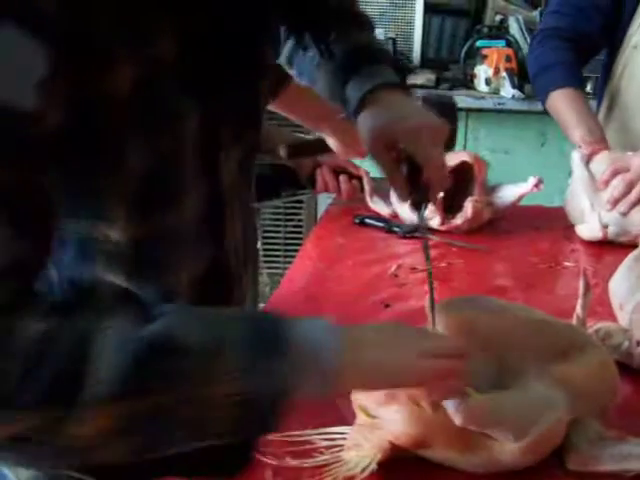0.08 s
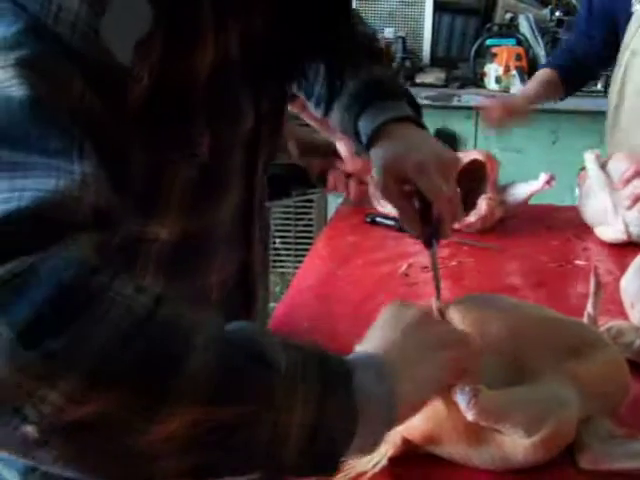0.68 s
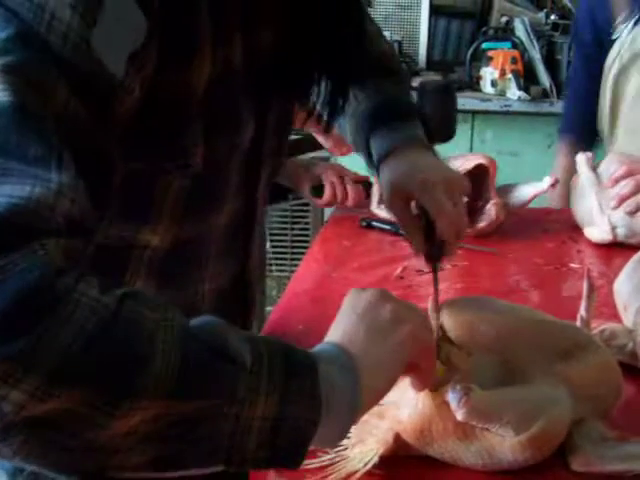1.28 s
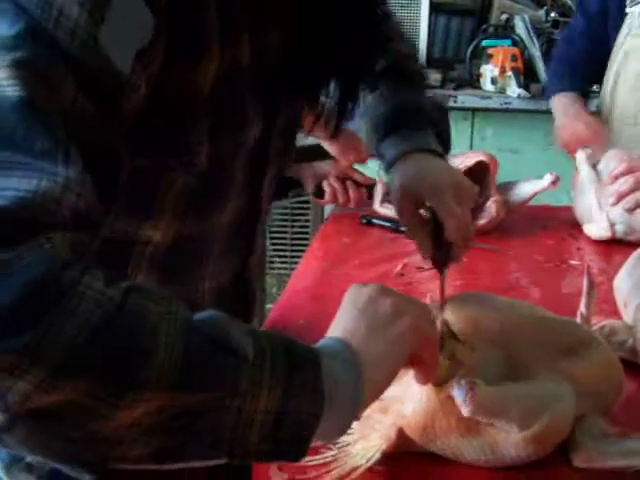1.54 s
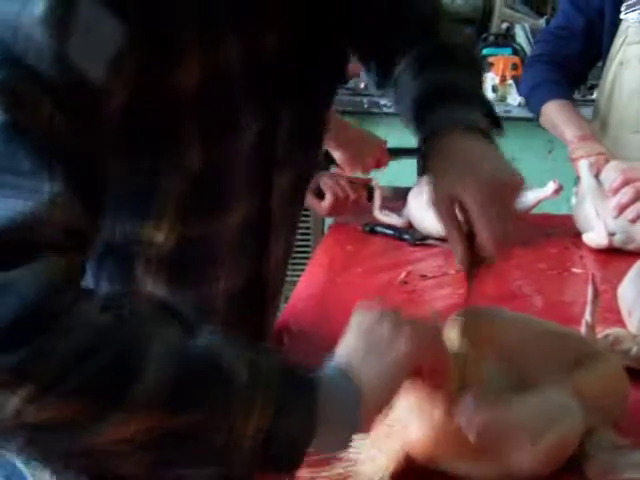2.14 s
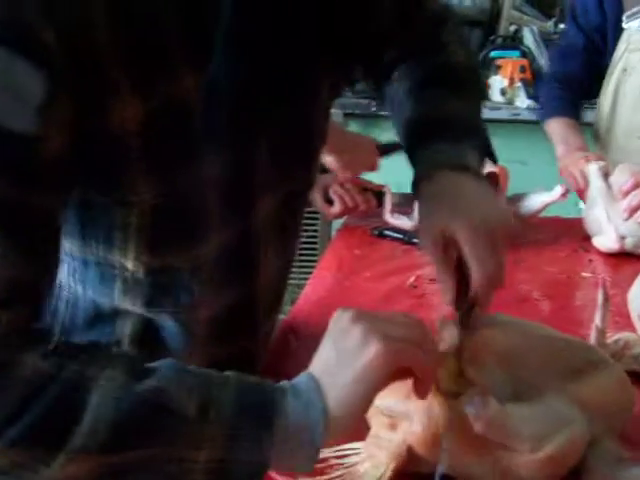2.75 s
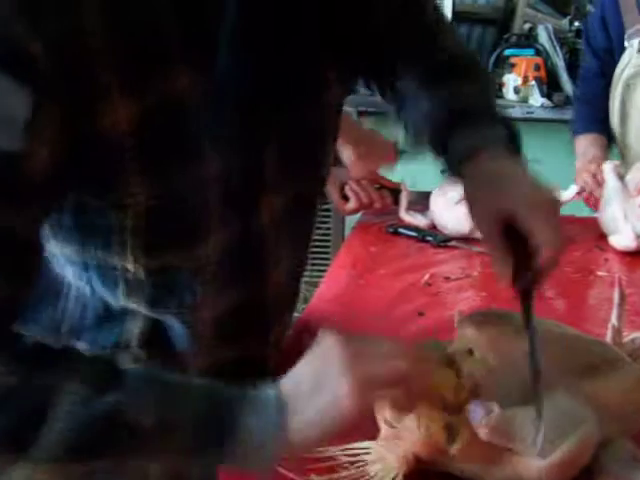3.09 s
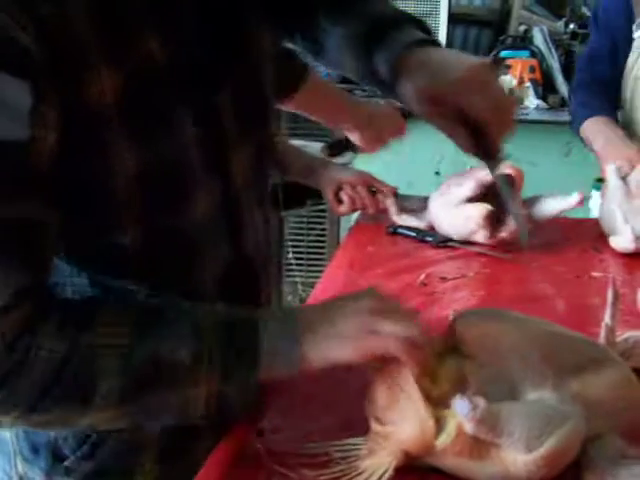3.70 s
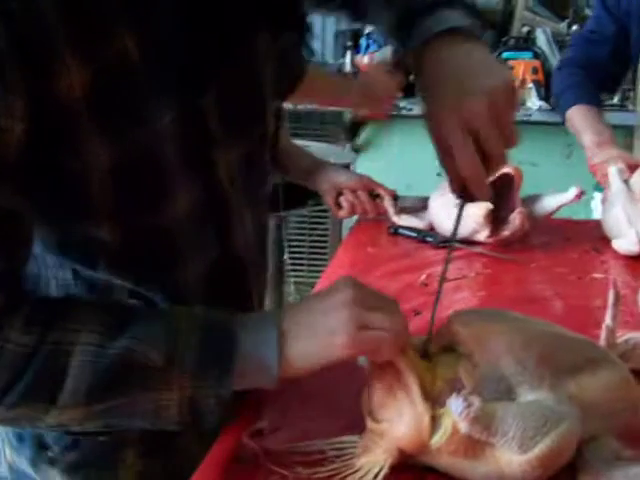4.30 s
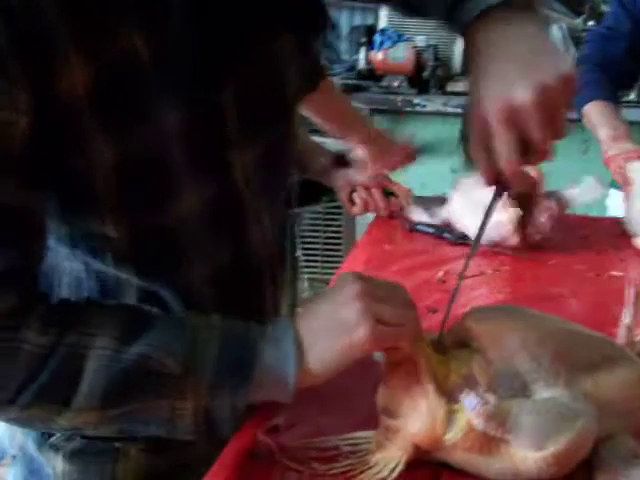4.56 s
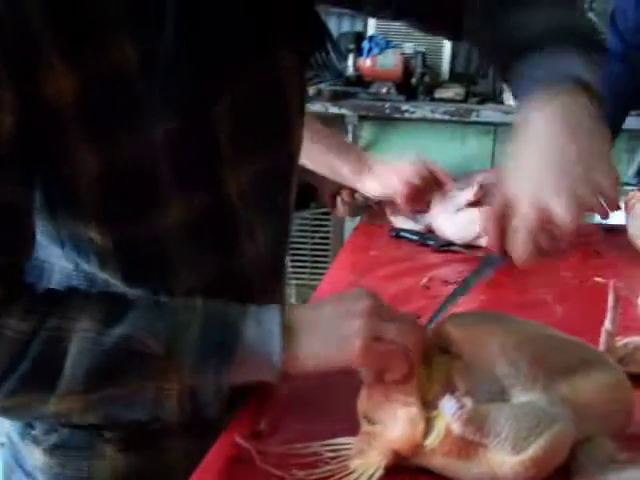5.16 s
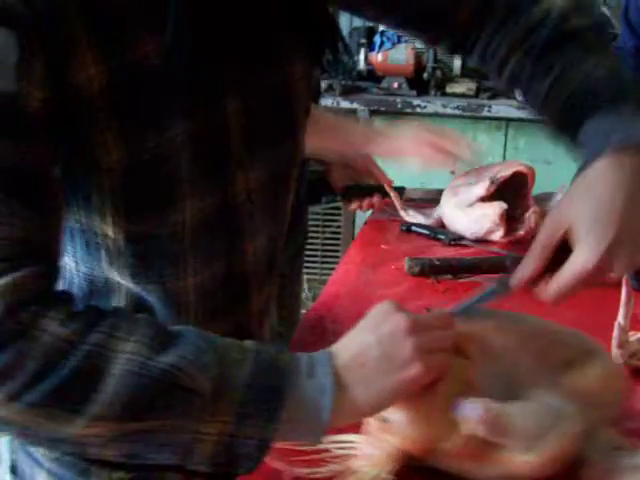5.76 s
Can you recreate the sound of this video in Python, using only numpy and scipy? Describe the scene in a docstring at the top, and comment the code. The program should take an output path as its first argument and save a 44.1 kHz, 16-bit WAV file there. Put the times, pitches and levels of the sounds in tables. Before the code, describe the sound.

A chicken is chopped up on a board, heard from a small microphone close to the table in a bare farm workroom. A loud, slightly distorted knife blow splinters bone and echoes. A quieter stretch follows, with wet ticks, fine slicing, little snips and soft low shoves, before four more blows knock and thump down. A low hum runs underneath.

```python
"""A bare, echoing farm workroom, a small microphone close to the table where a chicken is chopped up.
Over a low hum, wet skin ticks and a knife starts to slice. At 0.7 s a heavy blow crunches through bone,
thumps the board and overloads the microphone; the blade knocks, bone splinters and the room rings on.
The bird is shoved about with a soft rumble, amid bumps, faint slicing and snips of gristle.
From 3.5 to 5.7 s four more blows land, with small cuts between them."""
import sys
import numpy as np
from scipy import signal
from scipy.fft import rfft, irfft
from scipy.io import wavfile

SR = 44100
rng = np.random.default_rng(int(sys.argv[2]) if len(sys.argv) > 2 else 0)


def wrap_up_sound(samples):
    """Save the sound to the file named by the first command line argument, as 16-bit audio."""
    columns = np.atleast_2d(samples).T
    # keep every value between -1 and 1, then stretch to whole-number steps
    tamed = np.clip(columns, -1, 1)
    steps = np.round(tamed * 32767).astype(np.int16)
    wavfile.write(sys.argv[1], SR, steps)


N = 261072

# room tone, as a spectrum: (frequency [Hz], relative level [dB])
ROOM_TONE = [(15, -58), (25, -11), (49, -6.5), (63, -7), (77, -4), (97, -4.5), (199, -10), (299, -9),
             (530, -14), (875, -20), (1110, -17.5), (2170, -26.5), (3030, -25.5), (3490, -29), (7500, -34),
             (9750, -32.5), (16500, -120)]
# low hum in the room: (frequency [Hz], level [dB], half-width [Hz])
HUM_BANDS = [(96.94, -45.5, 3), (129.8, -49.5, 2.8)]
# reverberation of the bare room: (frequency [Hz], time to fall 60 dB [s])
ROOM_DECAY = [(100, 0.68), (260, 0.64), (700, 0.71), (1840, 0.76), (4850, 0.61), (8000, 0.43)]
# colour of that reverberation: (frequency [Hz], gain [dB])
ROOM_RESPONSE = [(25, -21.5), (60, -6), (130, 5.5), (300, 3), (600, -4.5), (1200, -5), (2400, -4),
                 (4500, -5.5), (8000, -11)]
# the knife snips a strand of gristle: (time [s], level [dB], centre [Hz])
GRISTLE_SNIPS = [(0.113, -29, 3020), (1.2878, -29.5, 4900), (1.392, -30, 6200), (1.6308, -28.5, 3450),
                 (1.943, -19, 4500), (2.0887, -29.5, 6180), (2.291, -30, 3300), (2.4043, -32, 4500),
                 (2.4589, -25, 4540), (2.6449, -16.5, 4950), (2.7982, -26.5, 4350), (2.828, -28.5, 6000),
                 (3.1430, -27, 7600), (3.1652, -28, 6870), (3.4258, -18.5, 6400), (3.441, -27.5, 6570),
                 (4.057, -33.5, 5150), (4.9670, -29, 5820), (5.282, -29.5, 3400), (5.6005, -23, 5700)]
# strokes of the blade through wet skin: (time [s], length [s], level [dB], centre [Hz])
SKIN_CUTS = [(0.601, 0.22, -47, 4160), (1.352, 0.99, -52, 4970), (2.103, 0.51, -52.5, 4860),
             (2.435, 0.076, -39, 5140), (2.626, 0.078, -38, 4700), (2.795, 0.047, -37.5, 4770),
             (4.028, 0.23, -51.5, 5400), (5.194, 0.23, -50.5, 5400)]
# heavy blows, each followed by its lighter rebound: (time [s], thump level [dB], thump centre [Hz],
#   mode with a node at that spot [Hz], smack level [dB], smack centre [Hz], room level [dB],
#   room centre [Hz], bone crunch level [dB])
BLOWS = [(0.7120, 4, 233, 271, -12.5, 1320, 18.5, 560, -11),
         (0.7790, -10, 400, 293, -18.5, 1010, 7.5, 520, -20),
         (3.5046, 2.5, 188, 387, -11, 1500, 16.5, 420, -6.5),
         (3.6007, -10.5, 440, 310, -12.5, 930, 13, 800, -32),
         (4.5190, 5.5, 206, 376, -4.5, 1120, 19.5, 460, -8.5),
         (4.5690, -8.5, 229, 396, -18, 910, 16, 760, -29), (5.4510, 8, 273, 880, -9.5, 705, 5.5, 260, -33),
         (5.4985, -6.5, 255, 490, -25.5, 2470, 2, 420, -28),
         (5.732, 0, 426, 206, -15.5, 1650, 18, 596, -40), (5.7770, -6, 480, 203, -34, 1500, -2, 1200, -42)]
# the blade knocks on bone and board: (time [s], level [dB], ring [Hz], room level [dB])
BLADE_KNOCKS = [(0.7108, 0, 3560, -10), (0.7300, 0, 2040, 8.5), (0.7788, -9, 1080, -6),
                (3.5045, 1, 2300, 9.5), (3.5223, -4, 2114, 1), (3.5996, -5, 1770, 6), (3.6227, -9, 1045, 1),
                (4.518, 1, 2090, -1.5), (4.536, -1.5, 1620, 9), (4.5685, -5.5, 2470, -9),
                (5.451, -2.5, 2430, -2), (5.731, 15, 2276, 13.5)]
# modes of the board and the table under it: (frequency [Hz], relative level [dB], time to fall 60 dB [s])
BOARD_MODES = [(67, -21.5, 0.63), (128, -3, 0.082), (182.7, -6, 0.057), (212.8, -2, 0.075),
               (247.6, -5, 0.12), (308, 4.5, 0.065), (350.6, 4, 0.065), (459, 3.5, 0.041),
               (537.6, 2, 0.063), (614.3, -4.5, 0.11), (754, -7.5, 0.13), (936, -30, 0.057),
               (1152, -2, 0.036), (1153, -10, 0.041), (1630, -9, 0.092)]
# the room's strongest resonances: (frequency [Hz], level relative to a blow's room level [dB])
STANDING_WAVES = [(303, -45.5), (494, -45.5), (544, -40.5), (612, -43.5), (721, -48), (967, -49.5),
                  (1112, -45.5), (1245, -46), (1470, -56.5), (1755, -48.5)]
# bone splinters around the blade: (time [s], level [dB], centre [Hz], decay [s])
BONE_CRACKS = [(0.7300, -16, 4140, 0.0019), (0.7565, -17, 4400, 0.0053), (0.8305, -18.5, 4180, 0.011),
               (0.8405, -17, 3950, 0.0053), (3.5070, -4.5, 5700, 0.0026), (3.5580, -15, 5360, 0.0031),
               (3.5685, -14, 5440, 0.003), (3.5765, -7.5, 4200, 0.0013), (3.5858, -14.5, 5670, 0.0038),
               (3.6380, -20, 4160, 0.0035), (4.5150, -6, 5260, 0.0016), (4.5270, -15.5, 4280, 0.004),
               (4.5690, -6, 4800, 0.00096), (4.5835, -18, 5260, 0.007), (5.4635, -26, 4960, 0.02),
               (5.8635, -28, 5600, 0.0013)]
# the bird is pushed along the table: (time [s], length [s], relative level [dB])
BIRD_SHOVES = [(1.047, 0.21, -32.5), (1.246, 0.78, -32.5), (1.998, 0.11, -36), (2.474, 0.18, -35.5),
               (2.69, 0.21, -41)]
# spectrum of a shove: (frequency [Hz], relative level [dB])
SHOVE_SPECTRUM = [(20, -17), (40, 7), (75, 3.5), (130, -1), (200, -8.5), (350, -29), (900, -63)]
# soft bumps close to the microphone: (time [s], level [dB], centre [Hz], decay [s])
CLOSE_BUMPS = [(1.312, -29, 110, 0.012), (1.474, -28.5, 173, 0.0094), (1.634, -26.5, 89, 0.029),
               (1.657, -17.5, 158, .011), (1.698, -24, 131, 0.0069)]
#   (frequency [Hz], gain [dB])
RECORDING_BAND = [(20, 1), (6000, -0.5), (7000, -1.5), (7700, -7), (8400, -17), (9100, -36.5), (10000, -91)]


def amp(db):
    """Decibels to gain."""
    return 10 ** (np.asarray(db) / 20)


def unit(x):
    """Scales to rms 1."""
    return x / np.sqrt(np.mean(x ** 2) + 1e-20)


def curve(points, hz):
    """Joins (Hz, value) points by straight lines on a log-frequency axis."""
    f, value = np.transpose(points)
    return np.interp(np.log(hz + 1), np.log(f + 1), value)


def add(mix, s, sound):
    """Lays a sound into the mix at time s."""
    part = mix[round(s * SR):][:len(sound)]
    part += sound[:len(part)]


def noise(gain, size=N, grain_db=0):
    """Noise of rms 1 whose spectrum is the function gain(Hz); grain_db breaks it up into crackle."""
    grains = np.repeat(np.clip(rng.standard_normal(size // 16 + 1), -2, 2), 16)[:size]
    white = rng.standard_normal(size) * amp(grain_db * grains)
    return unit(irfft(rfft(white) * gain(np.fft.rfftfreq(size, 1 / SR)), size))


def hump(hz, centre_hz, octaves):
    """A broad resonance on the log-frequency axis."""
    return 1 / (1 + (np.log2((hz + 1) / centre_hz) / octaves) ** 2)


def burst(centre_hz, decay_s, octaves, rise_s=0.00059, size=4096):
    """A dense cluster of tiny fractures: coloured, grainy noise that dies quickly."""
    t = np.arange(size) / SR
    shape = np.exp(-t / decay_s) * (1 - np.exp(-t / rise_s))
    sound = shape * noise(lambda f: hump(f, centre_hz, octaves) ** 2, size, grain_db=5.5)
    return sound * np.linalg.norm(shape) / np.linalg.norm(sound)


def click(centre_hz, octaves, size=512):
    """One smooth pulse of energy 1: what a blow radiates into the room, summed over all directions."""
    spectrum = hump(np.fft.rfftfreq(size, 1 / SR), centre_hz, octaves) ** 2
    pulse = np.fft.fftshift(irfft(spectrum))
    return pulse / np.linalg.norm(pulse)


def echo(x, build_s=0.065, gap_s=0.00059):
    """The room's tail at the microphone: uneven reflections thicken, each band dies at its own rate."""
    hz, t, bands = signal.stft(noise(np.ones_like, size=SR, grain_db=5), SR, nperseg=512)
    thickening = np.sqrt(1 - np.exp(-np.maximum(t - gap_s, 0) / build_s))
    shape = thickening * amp(-60 * t / curve(ROOM_DECAY, hz)[:, None])
    energy = SR * np.mean(shape ** 2, axis=1, keepdims=True)
    shape *= amp(curve(ROOM_RESPONSE, hz))[:, None] / np.sqrt(energy)
    return signal.fftconvolve(x, signal.istft(bands * shape, SR, nperseg=512)[1])


def in_room(direct, room_db):
    """The close sound with the room's tail behind it."""
    return direct + amp(room_db) * echo(direct)[:N]


def snaps(rows, octaves, rise_s, ring, room_db):
    """Short bursts in the room; each sets the piece it comes from ringing briefly."""
    out, t = np.zeros(N), np.arange(SR // 10) / SR
    for s, db, hz, decay_s in rows:
        tone = np.sin(2 * np.pi * hz * t) * np.exp(-t / decay_s) * (1 - np.exp(-t / rise_s))
        add(out, s, amp(db) * burst(hz, decay_s, octaves, rise_s))
        add(out, s, amp(db) * ring * tone)
    return in_room(out, room_db)


def stroke(length_s, peak_at):
    """The pressure of one push of the hand: an arch that reaches 1 at the share peak_at of its length."""
    progress = np.linspace(0, 1, round(length_s * SR))
    return np.sin(np.pi * np.interp(progress, [0, peak_at, 1], [0, .5, 1]))


def crackle(size, centre_hz, per_s, spread_db, octaves):
    """Wet fibres part one by one: dense tiny clicks of uneven strength and pitch, rms 1."""
    fibres = np.zeros(size)
    for hz in centre_hz * np.geomspace(.72, 1.4, 8):
        parting = rng.random(size) < per_s / 8 / SR
        strength = amp(spread_db * np.minimum(rng.exponential(1, size), 3.5))
        fibres += signal.oaconvolve(parting * strength, burst(hz, 0.0021, octaves, size=512))[:size]
    return unit(fibres)


def room_tone(air_db=-40.5):
    """The workroom's steady noise, with a wavering low hum."""
    hum = sum(amp(db) * noise(lambda f: 1 / (1 + ((f - hz) / width) ** 2)) for hz, db, width in HUM_BANDS)
    return hum + amp(air_db) * noise(lambda f: amp(curve(ROOM_TONE, f)))


def sticky_skin(per_s=16, floor_db=-47, spread_db=3, low_hz=3000, high_hz=7000):
    """Wet skin sticks and lets go under the fingers: faint scattered ticks, each with its own pitch."""
    out = np.zeros(N)
    for when, pitch, strength in rng.random((round(per_s * N / SR), 3)):
        tick = burst(low_hz * (high_hz / low_hz) ** pitch, decay_s=0.0036, octaves=0.59, size=1024)
        db = floor_db + spread_db * min(-np.log(strength), 3)
        add(out, when * N / SR, amp(db) * tick)
    return out


def gristle_snips(decay_s=0.0016):
    """Strands of gristle part under the knife, each with a small pitched click."""
    rows = [(*row, decay_s) for row in GRISTLE_SNIPS]
    return snaps(rows, octaves=1.0, rise_s=0.00034, ring=0.9, room_db=-5)


def slicing(flesh_db=-8, flesh_hz=1500):
    """Each stroke of the blade draws a fine crackle from the skin and a duller one from the flesh."""
    out = np.zeros(N)
    for s, length_s, db, hz in SKIN_CUTS:
        pressure = stroke(length_s, peak_at=0.2)
        skin = crackle(len(pressure), hz, per_s=330, spread_db=5.0, octaves=0.91)
        flesh = crackle(len(pressure), flesh_hz, per_s=220, spread_db=6.5, octaves=4.4)
        add(out, s, amp(db) * pressure * (skin + amp(flesh_db) * flesh))
    return in_room(out, room_db=-10)


def crunches(nick_lead_s=0.007, nick_db=-22, nick_hz=5200, bone_lead_s=0.0017, bone_hz=4370):
    """The edge nicks the skin, then crunches through bone just before it reaches the board."""
    nicks = [(s - nick_lead_s, db + nick_db, nick_hz, 0.0015) for s, *_, db in BLOWS]
    breaks = [(s - bone_lead_s, db, bone_hz, 0.0047) for s, *_, db in BLOWS]
    return snaps(nicks + breaks, octaves=1.3, rise_s=0.00017, ring=0.3, room_db=-5.5)


def blade_knocks(decay_cycles=3.6):
    """The blade rings for a few cycles, damped by the meat, inside a dry clack; the room answers."""
    out, t = np.zeros(N), np.arange(SR // 10) / SR
    for s, db, hz, room_db in BLADE_KNOCKS:
        decay_s = decay_cycles / hz
        knock = np.sin(2 * np.pi * hz * t) * np.exp(-t / decay_s)
        add(knock, 0, .5 * burst(hz, decay_s, octaves=1.15))
        add(out, s, amp(db) * knock)
        add(out, s, amp(room_db) * echo(click(hz, octaves=0.71)))
    return out


def chops(rise_s=0.0022, tail_db=-13):
    """Each blow smacks through meat, rings the board according to the spot it hits and fills the room."""
    out, t = np.zeros(N), np.arange(SR // 4) / SR
    hz, db, t60 = np.transpose(BOARD_MODES)[:, :, None]
    modes = amp(db - 60 * t / t60) * np.sin(2 * np.pi * hz * t) * (1 - np.exp(-t / rise_s))
    for s, thump_db, spot_hz, node_hz, smack_db, smack_hz, room_db, room_hz, _ in BLOWS:
        # a mode struck at its node stays silent
        reach = hump(hz, spot_hz, octaves=1.37) * (1 - hump(hz, node_hz, octaves=0.29))
        blow = amp(thump_db) * .5 * (modes * reach).sum(0)
        add(blow, 0, amp(smack_db) * burst(smack_hz, decay_s=0.0082, octaves=1.16))
        add(out, s, blow)
        add(out, s, amp(tail_db) * echo(blow))
        add(out, s, amp(room_db) * echo(click(room_hz, octaves=2.07)))
    return out


def standing_waves(build_s=0.053):
    """The bare room's resonances swell after each blow and die with its reverberation."""
    out, t = np.zeros(N), np.arange(SR) / SR
    hz, db = np.transpose(STANDING_WAVES)[:, :, None]
    envelopes = (1 - np.exp(-t / build_s)) * amp(db - 60 * t / curve(ROOM_DECAY, hz))
    for s, *_, room_db, _, _ in BLOWS:
        waves = np.sin(2 * np.pi * (hz * t + rng.random(hz.shape)))
        add(out, s, amp(room_db) * (envelopes * waves).sum(0))
    return out


def squelch(relative_db=-32, rise_s=0.065, fade_db_per_s=42.5):
    """Flesh torn by a blow goes on crackling as it parts; the harder the crunch, the louder."""
    out, t = np.zeros(N), np.arange(SR) / SR
    shape = np.minimum(t / rise_s, 1) * amp(relative_db - fade_db_per_s * t)
    for s, *_, crunch_db in BLOWS:
        tearing = crackle(len(t), centre_hz=5200, per_s=340, spread_db=9.0, octaves=0.52)
        add(out, s, amp(crunch_db) * shape * tearing)
    return in_room(out, room_db=0)


def bone_cracks():
    """Bone splinters in sharp, bright snaps as the blade wedges into it."""
    return snaps(BONE_CRACKS, octaves=2.3, rise_s=0.00011, ring=0.47, room_db=-3.5)


def shoves(trim_db=-2):
    """A lumpy low rumble swells and fades with each shove of the bird on the table."""
    pressure = np.zeros(N)
    for s, length_s, db in BIRD_SHOVES:
        add(pressure, s, amp(db) * stroke(length_s, peak_at=0.42))
    return amp(trim_db) * pressure * noise(lambda f: amp(curve(SHOVE_SPECTRUM, f)))


def close_bumps():
    """Soft low bumps, so near the microphone that they carry hardly any room."""
    return snaps(CLOSE_BUMPS, octaves=0.6, rise_s=0.0015, ring=0.87, room_db=-20)


def scene():
    """The workroom in mono, from close beside the table."""
    quiet_work = room_tone() + sticky_skin() + gristle_snips() + slicing()
    blows = crunches() + blade_knocks() + chops() + standing_waves() + squelch() + bone_cracks()
    return (quiet_work + blows + shoves() + close_bumps())[None]


def record(dry, ceiling=0.70, rail=0.73, edge_hz=16000):
    """Close blows overload the microphone; the band is narrowed, and overshoots clip before a low-pass."""
    overloaded = np.clip(dry, -ceiling, ceiling)
    band = amp(curve(RECORDING_BAND, np.fft.rfftfreq(N, 1 / SR)))
    narrow = irfft(rfft(overloaded) * band, N)
    low_pass = signal.firwin(255, edge_hz, window=("kaiser", 9), fs=SR)
    return signal.oaconvolve(np.clip(narrow, -rail, rail), low_pass[None], "same")


dry = scene()
out = record(dry)
wrap_up_sound(out)
```